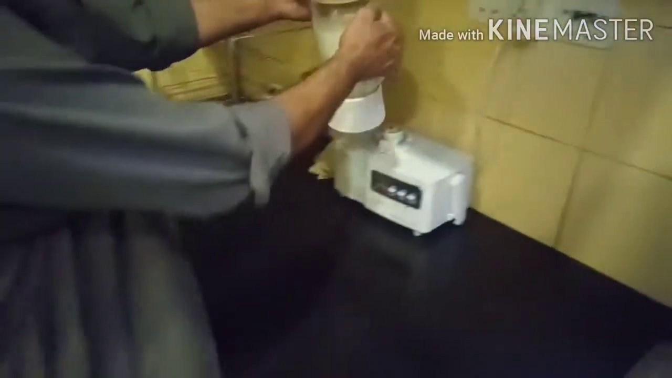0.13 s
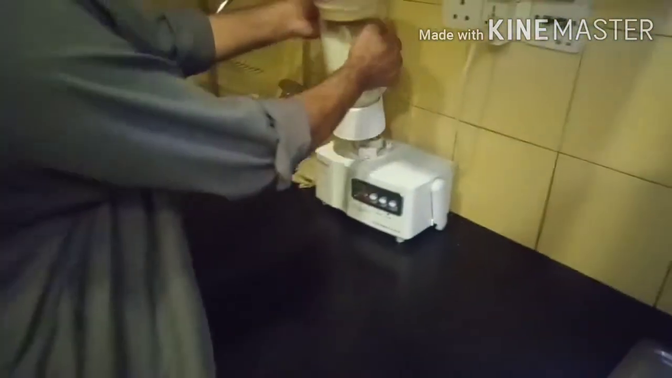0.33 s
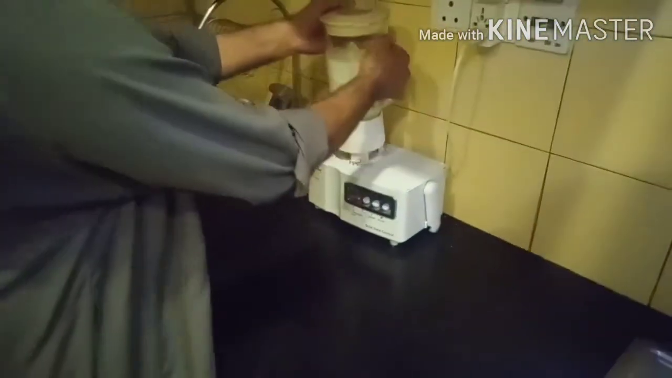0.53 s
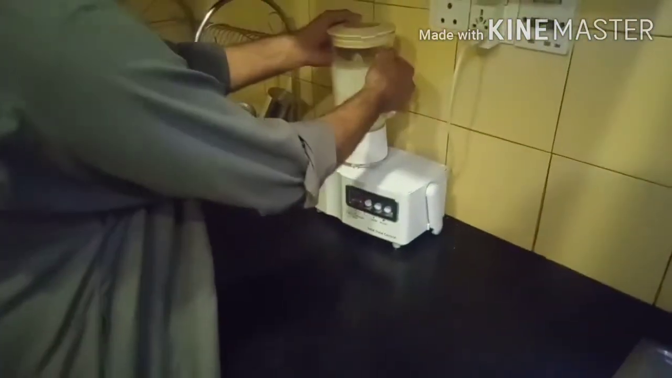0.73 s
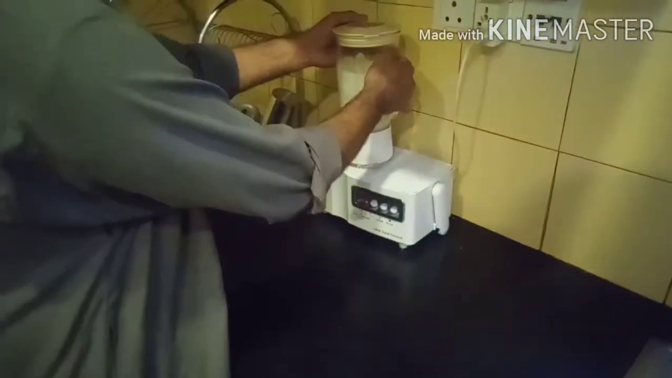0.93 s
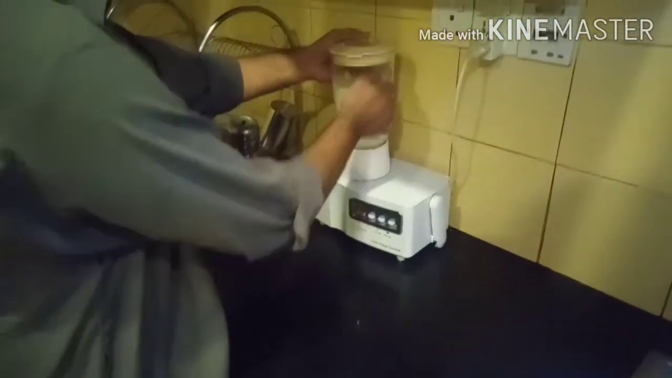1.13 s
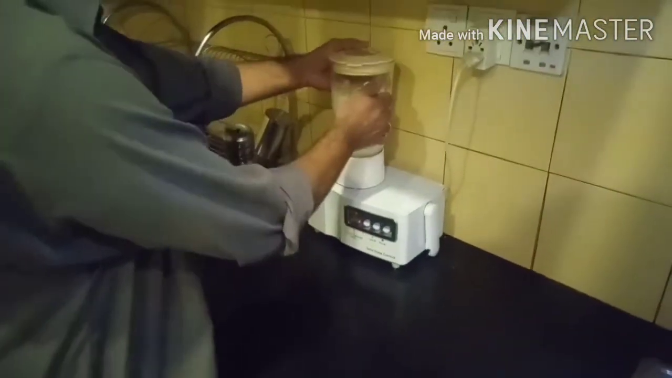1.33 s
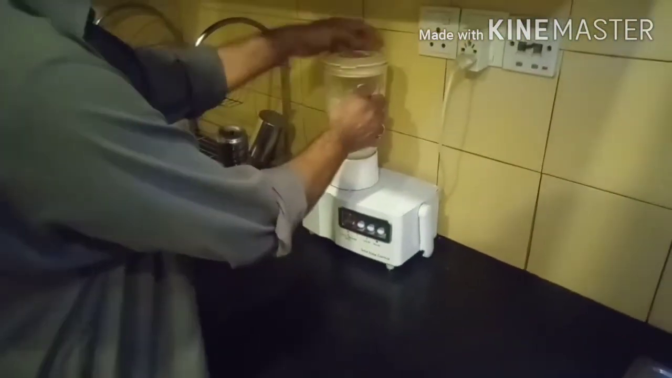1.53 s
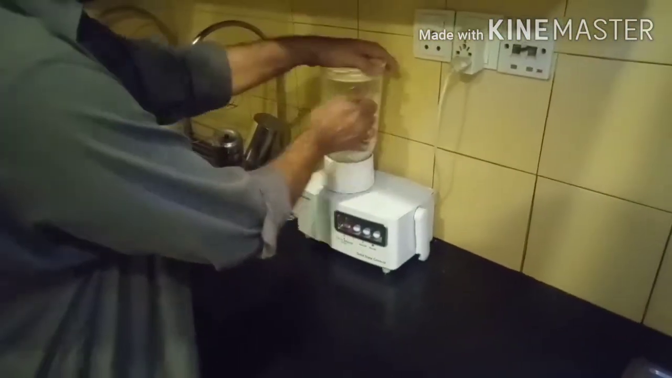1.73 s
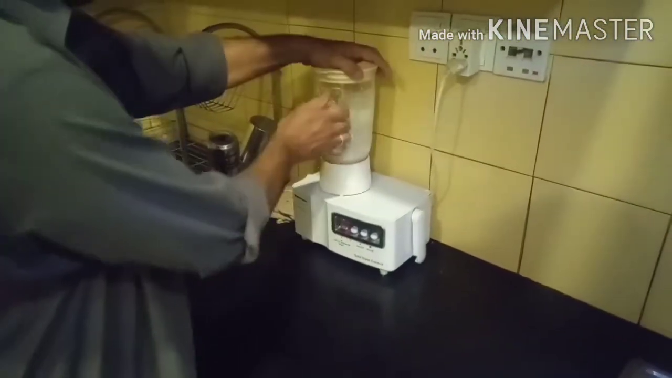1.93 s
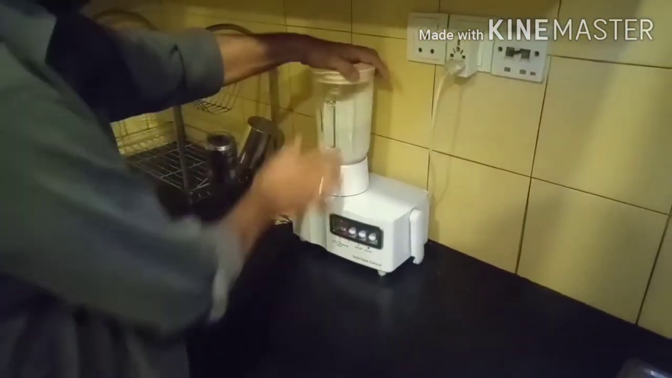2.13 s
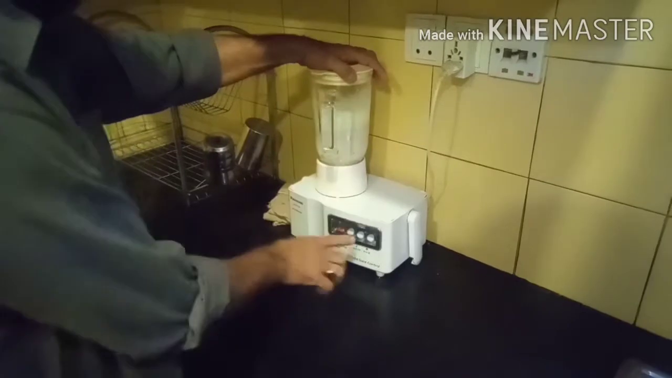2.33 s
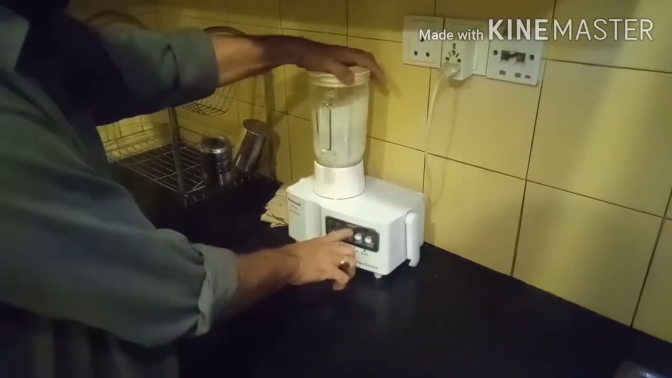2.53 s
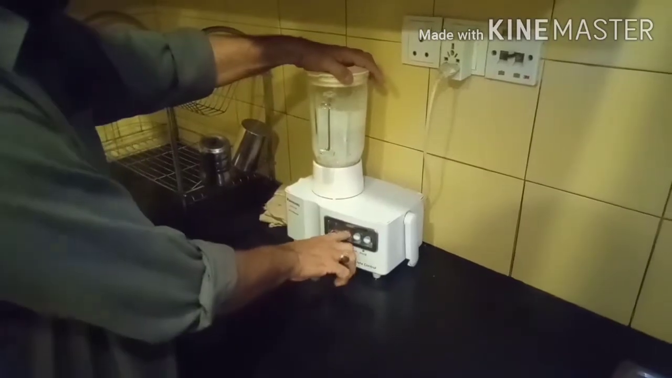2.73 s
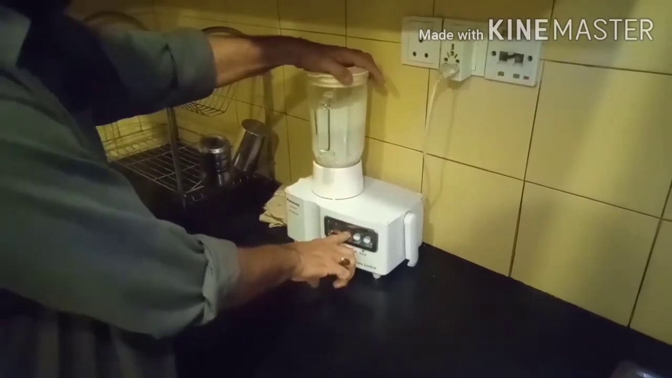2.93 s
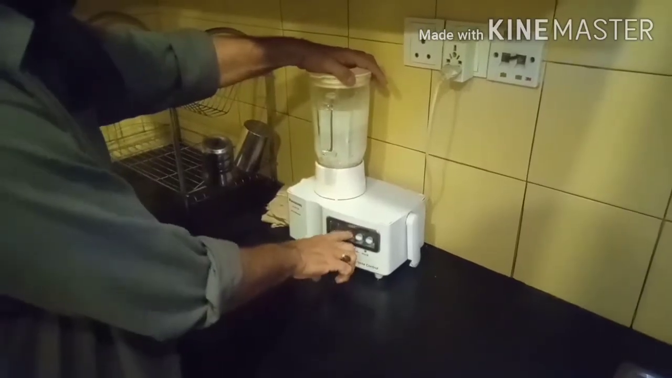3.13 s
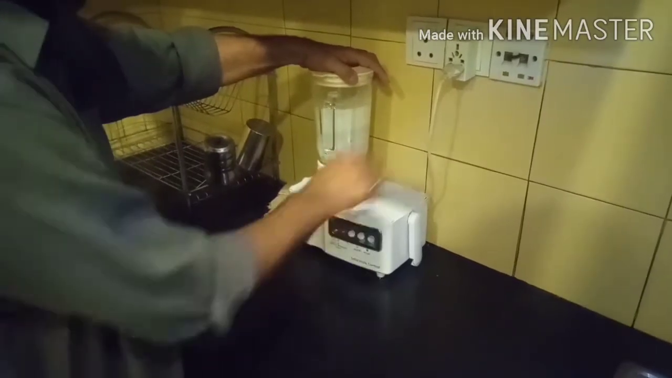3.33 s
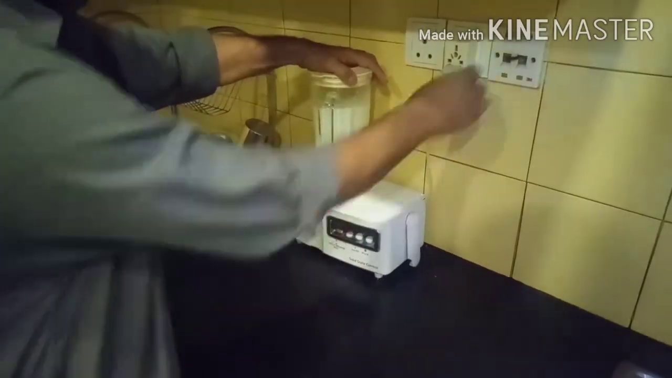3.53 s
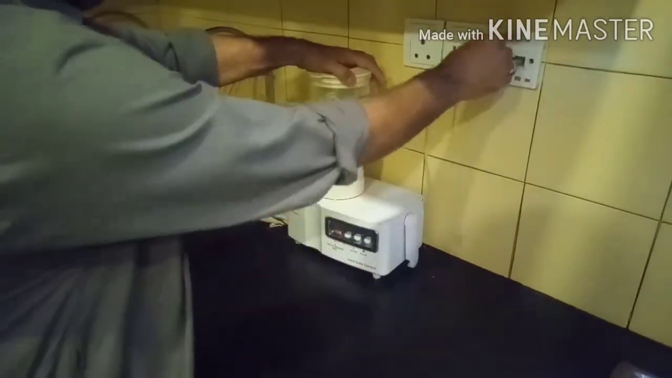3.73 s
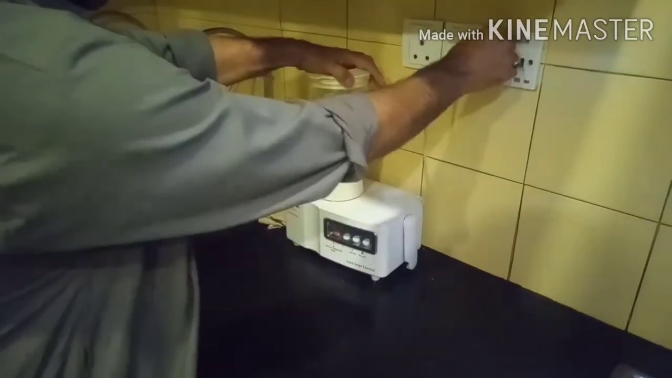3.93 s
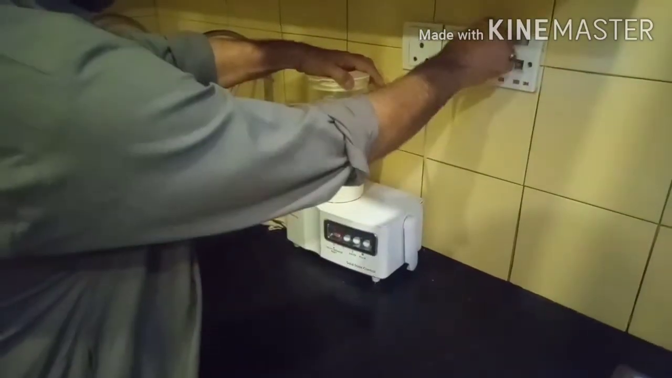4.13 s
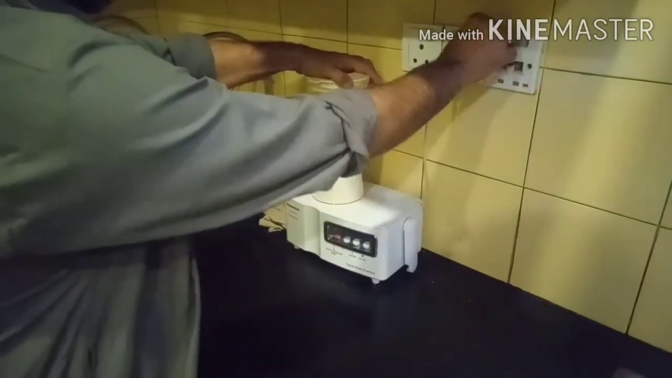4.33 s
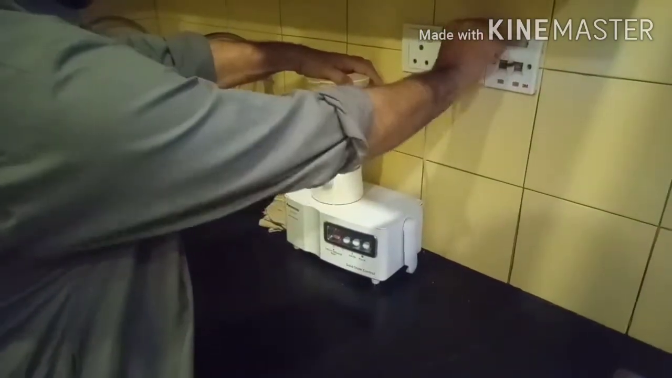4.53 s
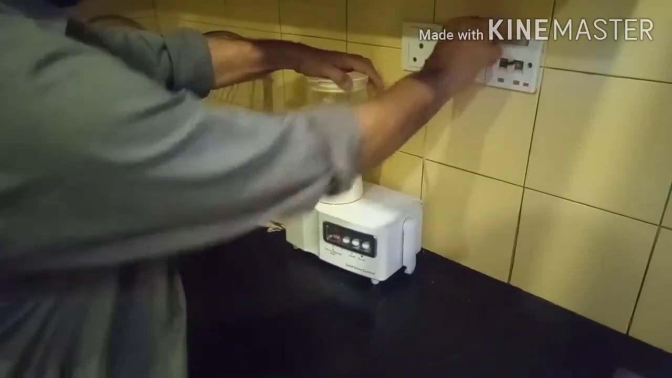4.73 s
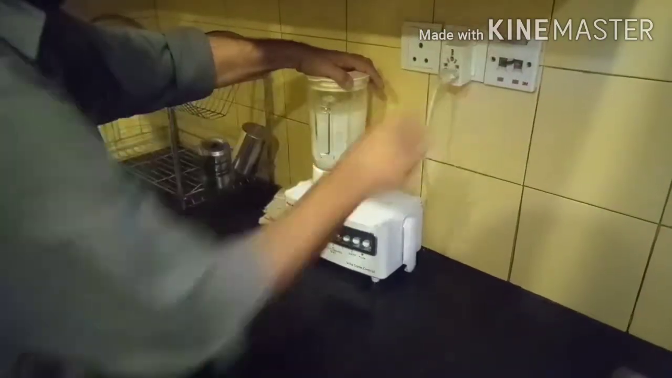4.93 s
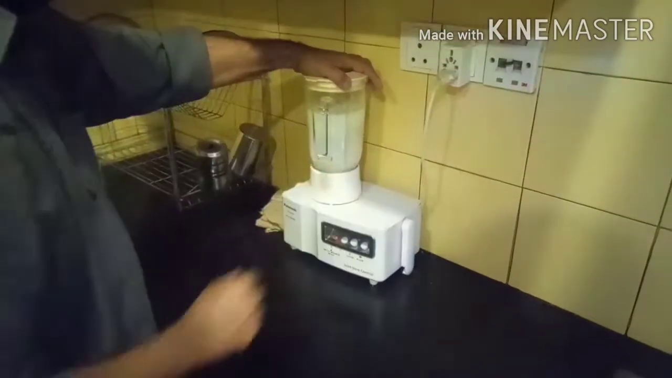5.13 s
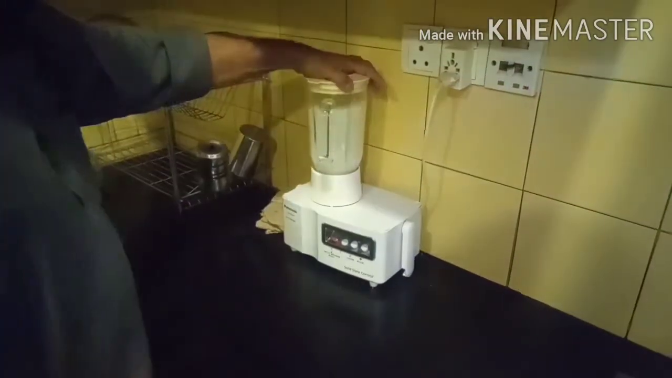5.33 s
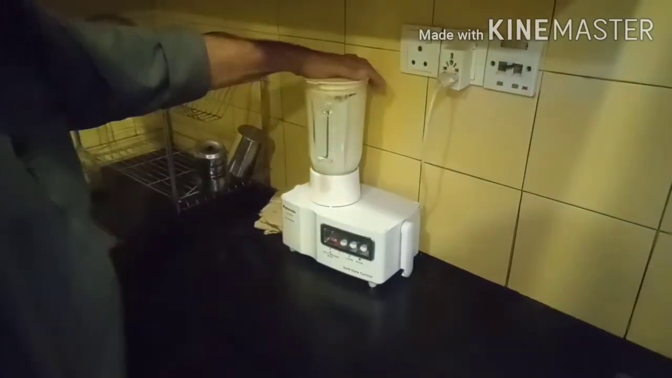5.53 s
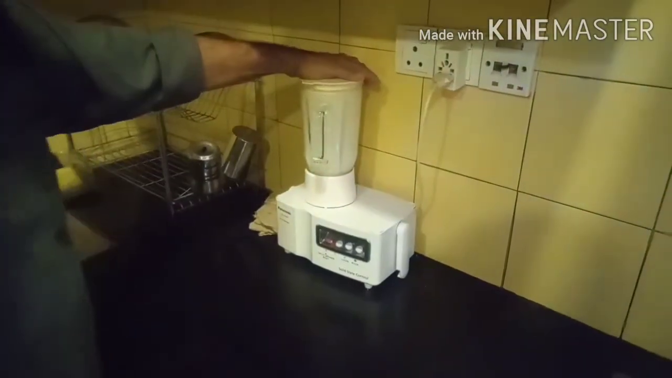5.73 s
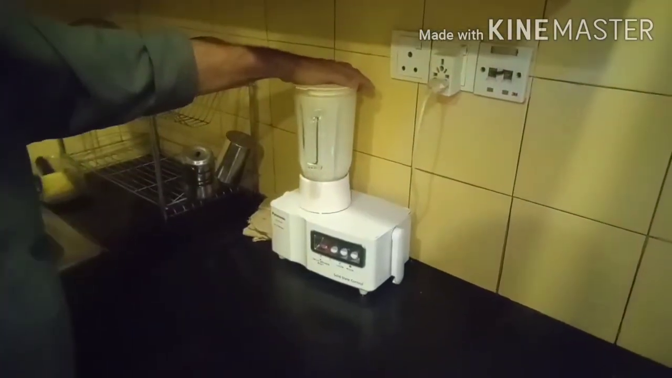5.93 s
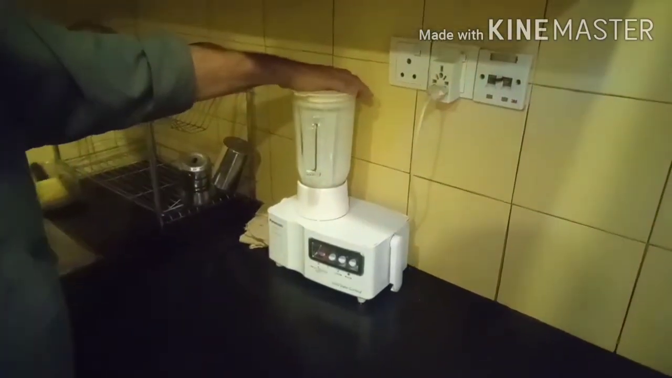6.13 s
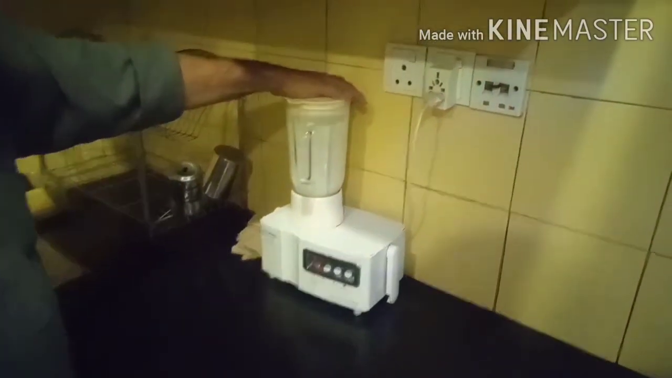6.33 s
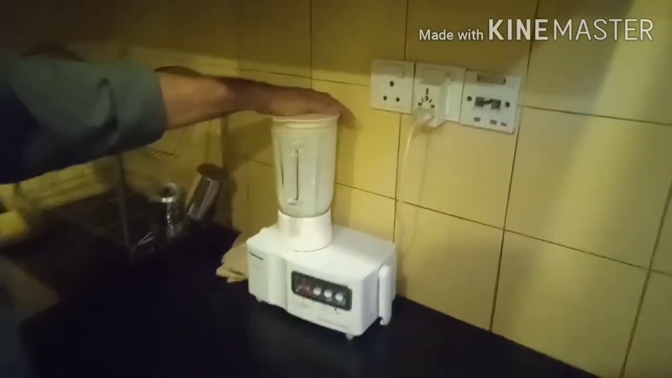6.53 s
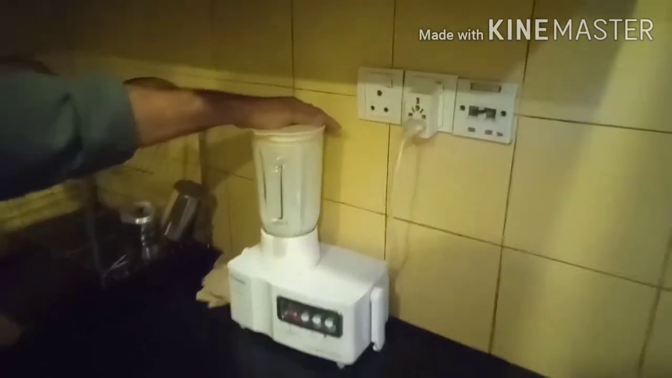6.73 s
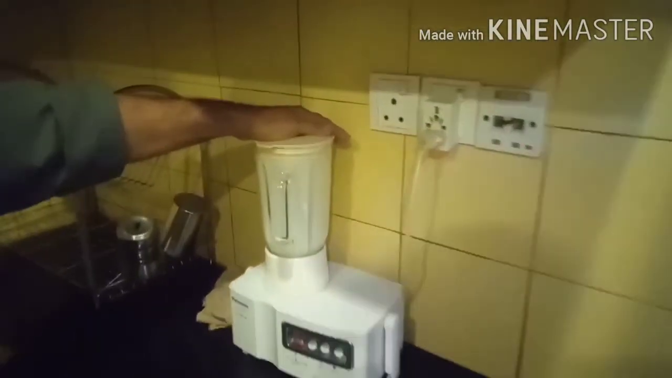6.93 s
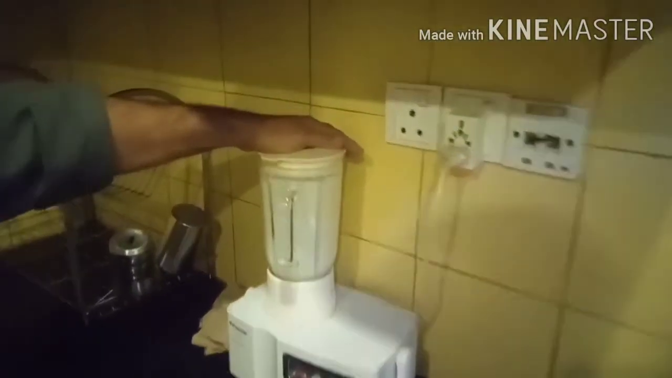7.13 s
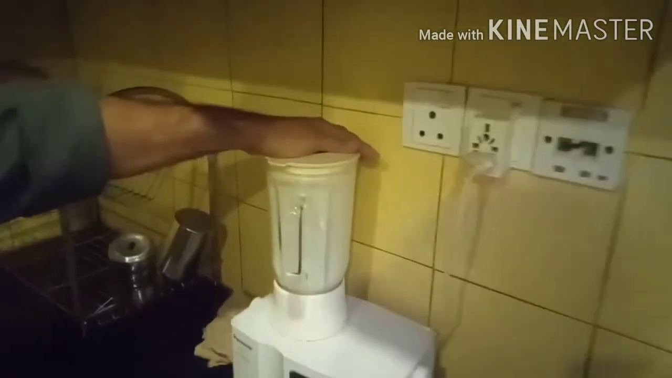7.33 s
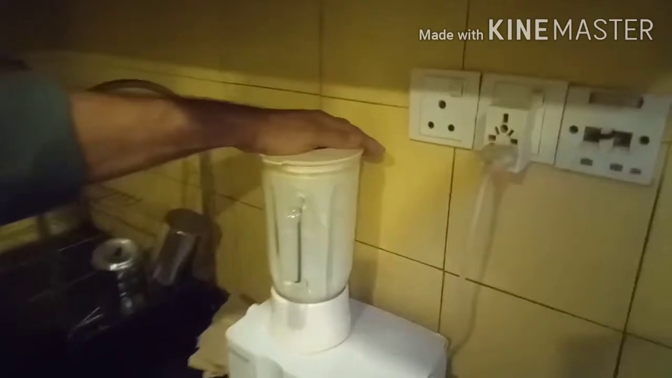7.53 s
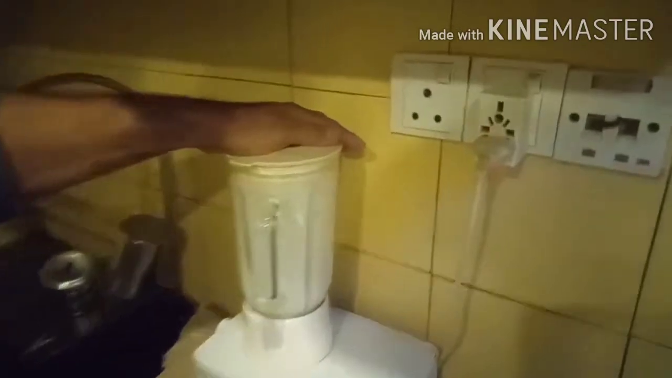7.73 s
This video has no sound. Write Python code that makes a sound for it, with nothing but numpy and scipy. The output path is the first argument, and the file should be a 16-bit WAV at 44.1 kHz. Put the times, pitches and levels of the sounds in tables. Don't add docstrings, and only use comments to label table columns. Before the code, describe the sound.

A plastic jar knocks and twists into a blender base, buttons click, a wall switch snaps and the blender motor whirrs loudly.

```python
import sys
import numpy as np
from scipy import signal
from scipy.fft import rfft, irfft, next_fast_len
from scipy.io import wavfile
from scipy.ndimage import uniform_filter1d, map_coordinates

SR = 44100
rng = np.random.default_rng(int(sys.argv[2]) if len(sys.argv) > 2 else 0)


def wrap_up_sound(samples):
    columns = np.atleast_2d(samples).T
    tamed = np.clip(columns, -1, 1)
    steps = np.round(tamed * 32767).astype(np.int16)
    wavfile.write(sys.argv[1], SR, steps)


def volts(x):
    e = np.asarray(x, float) / 20
    return 10 ** e


N = 342657
T = np.arange(N) / SR
MAINS_HZ = 50


def unit(x):
    return x / np.sqrt(np.mean(x ** 2) + 1e-20)


def along(points, hz):
    f, v = np.transpose(points)
    return np.interp(np.log(hz + 1), np.log(f + 1), v)


def curves(rows):
    s, *columns = np.transpose(rows)
    return [np.interp(T, s, column) for column in columns]


def ramp(start, length):
    return np.clip((T - start) / length, 0, 1)


def wobble(rate):
    return map_coordinates(rng.standard_normal(int(N * rate / SR) + 4), [T * rate])


def tone(hz, phase=0):
    return np.cos(2 * np.pi * hz * T + phase)


def filtered(x, response):
    m = next_fast_len(len(x) + 8192)
    return irfft(rfft(x, m) * response(np.fft.rfftfreq(m, 1 / SR)), m)[:len(x)]


def modes(table):
    def response(f):
        total = 0
        for k, (hz, width, db) in enumerate(table):
            total = total + (-1) ** k * volts(db) * 1j * f * width / (hz * hz - f * f + 1j * f * width)
        return total
    return response


def colour(spectrum):
    return lambda f: volts(along(spectrum, f)) * (f > spectrum[0][0]) * (f < spectrum[-1][0])


def ringing(spectrum, table, under_db):
    return lambda f: np.hypot(volts(under_db) * colour(spectrum)(f), np.abs(modes(table)(f)) ** 1.4)


def rush(response, patchy_db):
    z = signal.stft(rng.standard_normal(N), nperseg=1024)[2]

    def patch(tall, long):
        across = uniform_filter1d(rng.standard_normal(z.shape), tall, 0)
        return unit(uniform_filter1d(across, long, 1))

    field = patch(8, 4) + patch(2, 10)
    noise = signal.istft(z * volts(patchy_db * field), nperseg=1024)[1][:N]
    return unit(filtered(noise, response))


def bursts(times, db, t60, rise=0.0002):
    env, t = np.zeros(N + SR // 8), np.arange(SR // 8) / SR
    for s, level in np.broadcast(times, db):
        env[round(s * SR):][:len(t)] += volts(level - 60 * t / t60) * (1 - np.exp(-t / rise))
    return env[:N]


def whine(hz, width_hz):
    turn = 2 * np.pi * np.cumsum(hz) / SR
    band = wobble(width_hz) * np.cos(turn) + wobble(width_hz) * np.sin(turn)
    return unit(volts(1.1 * wobble(30)) * band)


# time in seconds, blade effort in dB, load on the housing in dB.
EFFORT = [
    (4.57, -26, -29),
    (4.66, -24.5, -27.5),
    (5.0, -27, -30),
    (5.5, -22.5, -30),
    (5.9, -21.5, -31.5),
    (6.3, -21.5, -33),
    (6.82, -22.5, -34.5),
    (6.92, -21.5, -31),
    (7.4, -19.5, -28.5),
    (7.77, -19, -28),
]
# time in seconds, lift in dB.
LUMPS = [
    (5.19, 2.5),
    (5.58, 2.5),
    (6.01, 2),
    (6.4, 0.5),
]
# time in seconds, share of the top that is rattle.
LOOSENESS = [
    (4.54, 1),
    (5.9, 0.68),
    (6.15, 0.38),
    (6.3, 0.044),
    (7.77, 0.14),
]


def motor():
    lump_s = 0.06
    lift_db = sum(db * np.exp(-((T - s) / lump_s) ** 2) for s, db in LUMPS)
    whirr_db, housing_db = curves(EFFORT) + lift_db
    loose = np.clip(curves(LOOSENESS)[0], 0, 1)
    torque = np.cos(2 * np.pi * 2 * MAINS_HZ * (T - 0.0085))
    flutter = wobble(70)
    top_db = -36 + 0.73 * (whirr_db + 22) + 6 * loose
    drone = housing(housing_db, torque, flutter)
    body = drone + churn(housing_db, flutter) + sings()
    blades = whirr(whirr_db, loose, torque, flutter) + fizz(top_db, loose)
    running = ramp(4.538, 0.013)
    return running * (body + blades + rattle(top_db, loose) + winding())


STAGE_MIDDLES = [4.9, 5.7, 6.5, 7.4]


def staged(broads, rings, under_db, patchy_db):
    total = 0
    for share, broad, table in zip(np.eye(len(rings)), broads, rings):
        fade = np.sqrt(np.interp(T, STAGE_MIDDLES, share))
        total = total + fade * rush(ringing(broad, table, under_db), patchy_db)
    return total


# frequency in Hz, level in dB per Hz.
HOUSING_SPECTRA = [
    [(24, -61), (40, -31), (65, -35), (92, -37), (123, -18), (259, -11.5), (424, -19), (776, 1.5),
     (1150, -15), (1500, -44), (2530, -120)],
    [(24, -59), (40, -25), (70, -24), (97, -16), (168, -13.5), (263, -12), (424, -15.5), (821, 2),
     (1150, -18), (1500, -42), (2530, -120)],
    [(24, -60.5), (40, -30), (92, -20), (123, -8), (259, -1), (436, -27), (524, -2.5), (765, -16),
     (1150, -9), (1500, -36), (2530, -120)],
    [(24, -65), (40, -34), (92, -14), (204, -6), (263, -31), (436, -12), (754, 4.5), (906, -4.5),
     (1150, -3), (1500, -20), (2530, -120)],
]
# frequency in Hz, width in Hz, level in dB.
HOUSING_RINGS = [
    [(262, 19, -4), (800, 320, -3.5)],
    [(273, 33, -5.5), (870, 250, -5)],
    [(275, 22, -0.5), (860, 250, -0.5)],
    [(261, 32, 1.5), (749, 70, 4)],
]


def housing(housing_db, torque, flutter):
    level_db = housing_db + 1.5 + 1.6 * torque + 1.1 * flutter + 0.36 * wobble(25)
    return volts(level_db) * staged(HOUSING_SPECTRA, HOUSING_RINGS, under_db=-2.0, patchy_db=0.8)


# frequency in Hz, level in dB per Hz.
CHURN_SPECTRUM = [(680, -28), (1150, -6.5), (1600, -10), (1710, -6), (2800, -4), (3640, -11.5),
                  (6160, -120)]
# frequency in Hz, width in Hz, level in dB.
WALL_RINGS = [
    [(1290, 79, -5), (1600, 48, -1), (2106, 25, 0), (2570, 60, 2)],
    [(1274, 67, -1), (1560, 90, 0.5), (2020, 200, -2.5)],
    [(1300, 38, 2), (1920, 130, 0.5), (2535, 18, 5)],
    [(2080, 36, -1)],
]


def churn(housing_db, flutter):
    churn_db = -29.5 + 0.79 * (housing_db + 29)
    spectra = [CHURN_SPECTRUM] * len(WALL_RINGS)
    level_db = churn_db + 0.54 + 0.29 * flutter + 0.25 * wobble(120)
    return volts(level_db) * staged(spectra, WALL_RINGS, under_db=-3, patchy_db=0.5)


# middle in seconds, half length in seconds, pitch in Hz, level in dB.
SINGING = [
    (4.62, .05, 2570, -39),
    (5.08, 0.22, 2570, -36),
    (5.6, 0.28, 4740, -37),
    (6.703, 0.33, 6160, -37.5),
    (6.8, .08, 4780, -35),
    (7.45, .08, 2870, -37),
]


def sings():
    total = 0
    for s, half, hz, db in SINGING:
        total = total + volts(db) * np.exp(-((T - s) / half) ** 4) * whine(hz + 0 * T, width_hz=70)
    return total


# frequency in Hz, level in dB per Hz.
WHIRR_SPECTRA = [
    [(1590, -15), (2700, -2.5), (3750, 2.5), (4060, -5), (4360, 0.5), (4680, -5), (5700, -8), (6600, -12),
     (8580, -30), (14500, -120)],
    [(1590, -34), (2700, -6), (3610, -0.5), (4280, -2.5), (5310, -10), (5830, -17), (6310, -14),
     (6600, -15), (8580, -41), (14500, -120)],
    [(1590, -27), (2700, -14), (3380, -3), (3840, -4), (5270, -6.5), (5730, -18), (6290, -11), (6600, -36),
     (8580, -49), (14500, -120)],
    [(1590, -39), (2700, -18), (2810, -8), (3810, -0.5), (4390, -4), (4700, -7.5), (5490, -9), (6600, -17),
     (8580, -37), (14500, -120)],
]
# frequency in Hz, width in Hz, level in dB.
WHIRR_RINGS = [
    [(2960, 60, 2), (3280, 50, 3), (3700, 170, 4.5), (4230, 200, 1), (5020, 150, -9)],
    [(3750, 120, -8), (4340, 120, 1), (4840, 70, 1.5), (5250, 150, -4), (6400, 91, -14)],
    [(3900, 110, -1), (4360, 120, 0), (5087, 90, -1), (6200, 61, -5)],
    [(3430, 110, 0.5), (3720, 50, 1), (4040, 100, -2), (4360, 98, -1), (4970, 47, -4), (5200, 130, -4)],
]
# time in seconds, pitch in Hz, dB relative to the whirr.
BLADE_DRIFT = [(5.35, 3725, -12), (5.5, 3750, -21), (5.62, 3740, -6), (5.72, 3800, -10), (5.82, 4040, -6),
               (5.95, 3700, -21), (6.12, 3920, -9), (6.5, 3856, -6.5), (6.82, 3800, -3.5), (7.0, 3720, -10),
               (7.2, 3580, -12), (7.37, 3560, -4), (7.46, 3620, -19), (7.56, 3970, -4), (7.64, 3900, -9),
               (7.77, 3700, -17)]
# time in seconds, steady hub and late ridge in dB relative to the whirr.
HUB_AND_RIDGE = [(5.35, -14, -40), (5.58, -5.5, -40), (5.66, -20, -40), (5.74, -3, -37), (5.9, -17, -35),
                 (6.05, -1.5, -30), (6.2, -12, -25), (6.6, -5, -27), (6.95, -7, -28), (7.24, -8, -19),
                 (7.36, -9, -6), (7.43, -25, -17), (7.5, -9, -4), (7.62, -10, -11), (7.77, -8, -5)]


def whirr(whirr_db, loose, torque, flutter):
    tearing = staged(WHIRR_SPECTRA, WHIRR_RINGS, under_db=1.0, patchy_db=1.1)
    blade_hz, blade_db = curves(BLADE_DRIFT)
    hub_db, ridge_db = curves(HUB_AND_RIDGE)
    hub_hz = 4364 + 25 * wobble(3.2)
    ridge_hz = 5460 - 300 * np.abs(T - 7.35)
    whines = volts(blade_db) * whine(blade_hz, width_hz=220)
    whines += volts(hub_db) * whine(hub_hz, width_hz=200)
    whines += volts(ridge_db) * whine(ridge_hz, width_hz=400)
    thinned = ramp(BLADE_DRIFT[0][0], 0.12)
    level_db = whirr_db - 0.75 + 0.73 * loose * torque + 0.62 * flutter + 0.75 * wobble(400)
    return volts(level_db) * (tearing + thinned * whines)


# frequency in Hz, level in dB per Hz.
FIZZ_SPECTRUM = [(3760, -14), (6400, -1), (6640, -3), (7620, -4), (9210, -14), (10600, -19.5),
                 (12800, -18.5), (15600, -35)]


def fizz(top_db, loose):
    return volts(top_db + 2.1 * wobble(300)) * np.sqrt(1 - loose) * rush(colour(FIZZ_SPECTRUM), patchy_db=-0.5)


# frequency in Hz, level in dB per Hz.
COUPLING_SPECTRUM = [(3530, -41), (6000, -17), (6390, 2), (7090, 2.5), (8520, -12.5), (9500, -11.5),
                     (10400, -11.5), (11000, -9), (11800, -13.5), (14500, -21), (15600, -29)]
# time in seconds, peak in dB.
HARD_RATTLES = [(4.5538, -17), (4.5753, -13), (4.5957, -15), (4.6152, -15), (4.7364, -18), (4.7963, -15),
                (4.8467, -17), (4.8661, -14), (4.907, -15), (4.9375, -16), (4.9759, -17), (4.9973, -14),
                (5.0178, -16), (5.0362, -14), (5.0562, -17), (5.0772, -15), (5.1086, -16), (5.126, -17),
                (5.1674, -18), (5.2263, -17), (5.2797, -17), (5.3171, -16), (5.3366, -14), (5.4074, -17),
                (5.4593, -20), (5.5052, -15), (5.5271, -14), (5.5955, -15), (5.6164, -10), (5.6878, -13),
                (5.7047, -14), (5.8983, -16), (5.9352, -17), (5.9681, -13), (6.039, -18), (6.0564, -15),
                (6.0779, -16), (6.1168, -17), (6.3567, -16), (6.948, -21), (7.6897, -20)]


def rattle(top_db, loose):
    beat = np.arange(4.5565, N / SR - 0.01, 0.5 / MAINS_HZ)
    luck = rng.standard_normal((len(beat), 2))
    late = 0.0013 * luck[:, 0]
    beat_db = 3 * luck[:, 1] + 3.9 * (-1) ** np.arange(len(beat))
    taps = unit(0.5 + bursts(beat + late, beat_db, t60=0.024))
    s, db = np.transpose(HARD_RATTLES)
    blows = volts(top_db - 0.5) * np.sqrt(loose) * taps + bursts(s, db - 15, t60=0.022)
    teeth = rush(colour(COUPLING_SPECTRUM), patchy_db=0.5)
    shaken_jar = volts(0.5) * rush(colour(WHIRR_SPECTRA[0]), patchy_db=-2.0)
    return blows * (teeth + shaken_jar)


def winding():
    second = volts(-53 + 0.5 * wobble(5.8)) * tone(2 * MAINS_HZ, phase=3)
    third = volts(-50.0 + 1.4 * wobble(1.52)) * tone(3 * MAINS_HZ)
    return second + third


# frequency in Hz, width in Hz, level in dB.
BASE_MODES = [
    (264, 27, 8.2),
    (207, 75, 0.91),
]
JAR_MODES = [
    (665, 150, 7),
    (910, 240, 5.5),
    (1010, 260, -25),
    (1300, 120, -12),
]


def contacts(table, body, top, snap_hz, spread, rise, t60, gain_db):
    s, db, base_db, jar_db, edge_db = np.transpose(table)
    db = db + gain_db
    snap, t = np.zeros(N + SR), np.arange(SR // 8) / SR
    harder = 1 + 0.0032 * (db - db.mean())
    pitches = snap_hz * harder * np.exp(spread * rng.standard_normal(len(s)))
    noises = rng.standard_normal((len(s), len(t)))
    for start, level, hz, noise in zip(s, db, pitches, noises):
        rasp = unit(filtered(noise, ringing(body, [(hz, 0.076 * hz, 1.5)], under_db=0.5)))
        snap[round(start * SR):][:len(t)] += volts(level - 60 * t / t60) * (1 - np.exp(-t / rise)) * rasp
    edge_noise = unit(filtered(rng.standard_normal(N), colour(top)))
    edge = bursts(s, db + edge_db + 3.5, 0.69 * t60, rise) * edge_noise
    jar = filtered(bursts(s, db + jar_db + 16, 0.0029), modes(JAR_MODES))
    base = filtered(bursts(s, db + base_db + 21.5, 0.0093, rise=0.00086), modes(BASE_MODES))
    return snap[:N] + edge + jar + base


# time in seconds, peak in dB, then base thud, jar knock and top edge in dB relative to the peak.
LANDING = [(0.6414, -42, -11, -5, -10), (0.6705, -38.5, -9, -7, -5), (0.6897, -31, -19, -16, -18),
           (0.7535, -32, -15, -4, -25), (0.7595, -29.5, -6, -4, -20), (0.7641, -33, -18, 2, -4),
           (0.7922, -27, -7.5, -3, -17), (0.8252, -32, -22, -8, -13), (0.9003, -37, 5.5, 7, -24),
           (0.9265, -47, -9, -9, -5), (1.0694, -39, 8, 4, -19), (1.112, -35, -14, -9, -3),
           (1.1273, -33, -13, -13, -15), (1.1545, -30, -21, -7, -15), (1.1625, -19, -28, -7, -24),
           (1.1795, -21.5, -4, -3, -12), (1.186, -23, -3, -1, -11), (1.196, -28, -14, 2, -12),
           (1.2068, -27, -18, 0, -29), (1.23, -31, -21, 4, -6), (1.2574, -34, -20, 4, -20)]
TWISTING = [(1.725, -46, -17, -15, -4), (1.7503, -29, -5, -15, -12), (1.7915, -23, -10, -17, -18),
            (1.7977, -23, -8, -10, -5), (1.8095, -21, -5.5, -8, -15), (1.8305, -28.5, -18, -9, -2),
            (1.845, -31, -18, -6, -12), (1.8645, -41, -13, -5, -8), (1.883, -42, -25, -20, -17),
            (1.888, -13, -17, 5.5, -9), (1.892, -15.5, -20, -3, -2), (1.8962, -16, -20, 11, -7),
            (1.901, -24, -22, -6, -3), (1.9135, -23.5, -21, 4, -2), (1.933, -32, -20, -8, -6),
            (1.9505, -20, -23, -10, -14), (1.9625, -19, -17, -8, -6), (1.9825, -24, -32, -2, -3)]
# frequency in Hz, level in dB per Hz.
JAR_SNAP = [(410, -34), (700, -5), (2270, -0.5), (2580, 0), (2820, -6), (3410, 0), (6000, -11.5),
            (7800, -43), (13200, -120)]
JAR_RIM = [(3240, -37), (5500, -10), (6950, 3.5), (8230, -10), (11200, -11), (15500, -23)]


def jar_contacts():
    landing = contacts(LANDING, JAR_SNAP, JAR_RIM, snap_hz=3240, spread=0.11, rise=0.00066, t60=0.044,
                       gain_db=-3.0)
    lock = contacts(TWISTING, JAR_SNAP, JAR_RIM, snap_hz=3200, spread=0.15, rise=0.00066, t60=0.034,
                    gain_db=-3.0)
    return landing + lock


# time in seconds, level in dB, pitch in Hz, t60 in seconds.
HANDLING_BUMP = [
    (1.188, -33, 53.7, 0.3),
]


def handling_bump():
    total = 0
    for s, db, hz, t60 in HANDLING_BUMP:
        t = np.abs(T - s)
        boom = volts(db - 60 * t / t60) * np.sin(2 * np.pi * hz * t) * (1 - np.exp(-t / 0.023))
        total = total + boom * (T > s)
    return total


# time in seconds, peak in dB, then base thud, jar knock and top edge in dB relative to the peak.
BUTTONS = [
    (2.6935, -26.5, -27, -20, -13),
    (2.776, -15, -26, -11, -17.5),
    (2.9431, -27, -29, -22, -20),
    (3.1765, -38, -24, -20, -11),
    (3.1825, -29.5, -22, -22, -22),
    (3.1916, -33, -16, -16, -6.5),
    (3.2727, -41, -11, -4, -9),
    (4.133, -43, -9, -11, -22),
    (4.2716, -32.5, -20, -11, -13),
]
# frequency in Hz, level in dB per Hz.
BUTTON_BODY = [(410, -34), (700, -3), (1250, -4), (1600, -3), (2010, -2.5), (2300, -3), (2620, 0.5),
               (2900, -3), (3500, 4.5), (4300, -5), (5200, -19), (7800, -43), (13200, -120)]
BUTTON_EDGE = [(3240, -33), (5400, -14), (6200, 1.5), (6900, -6), (9050, -19), (11000, -17), (15500, -30)]


def buttons():
    return contacts(BUTTONS, BUTTON_BODY, BUTTON_EDGE, snap_hz=3560, spread=0.03, rise=0.0003, t60=0.046,
                    gain_db=-3.5)


# time in seconds, peak in dB, then base thud, jar knock and top edge in dB relative to the peak.
WALL_SWITCH = [
    (4.519, -11, -34, -31, -6),
]
# frequency in Hz, level in dB per Hz.
SWITCH_BODY = [(710, -36), (1200, -18), (2410, -4), (2650, -4), (2890, 2), (3100, -9), (3360, 5),
               (3900, -2), (4280, -2), (4690, -5), (5600, -16), (7800, -41), (13200, -120)]
SWITCH_EDGE = [(3240, -33), (5500, -15), (6400, -1), (9050, -21), (11000, -16), (15500, -26)]


def wall_switch():
    return contacts(WALL_SWITCH, SWITCH_BODY, SWITCH_EDGE, snap_hz=4700, spread=0, rise=0.00036, t60=0.053,
                    gain_db=-6.0)


def stroke(s, db, swell, fade):
    return volts(db - 60 * np.where(T < s, (s - T) / swell, (T - s) / fade))


# loudest moment in seconds, level in dB, swell in seconds, fade in seconds.
SEAT_STROKES = [
    (0.768, -40, 0.033, 0.13),
    (1.182, -29.5, 0.055, 0.14),
    (1.231, -41, 0.027, 0.11),
    (1.796, -34, 0.016, 0.27),
    (1.899, -30, 0.017, 0.17),
    (1.966, -37.5, 0.17, 0.17),
]
LUG_SCRAPES = [
    (1.8, -31, .04, .2),
    (1.864, -38, .1, .06),
    (1.963, -26, .2, .16),
    (1.9, -29, .02, .17),
    (0.768, -39, .08, .07),
    (1.19, -37, .08, .15),
]
# frequency in Hz, level in dB per Hz.
SEAT_SPECTRUM = [(88, -45), (150, -37), (263, 4.5), (420, -12), (766, 5.5), (1130, -3.5), (2410, -10.5),
                 (2600, -6.5), (5870, -21), (6730, -19), (15500, -53)]
LUG_SPECTRUM = [(1200, -22), (2000, -5), (3000, 0), (4300, 1.5), (5400, -14), (6900, -2), (8300, -16),
                (11200, -19), (15500, -31)]


def slides():
    grind = volts(3.2 * wobble(250) + 6.5) * rush(colour(SEAT_SPECTRUM), patchy_db=0.0)
    scrape = volts(2 * wobble(300)) * rush(colour(LUG_SPECTRUM), patchy_db=3.5)
    rubbing = sum(stroke(*row) for row in SEAT_STROKES) * grind
    scraping = sum(stroke(*row) for row in LUG_SCRAPES) * scrape
    return rubbing + scraping


# frequency in Hz, level in dB per Hz.
CLOTH_SPECTRUM = [(2350, -31), (4000, -2), (9630, -13), (12600, -17), (15500, -26)]


def sleeve():
    middle_s, width_s, level_db = 0.36, 0.086, -52.5
    swell = np.exp(-((T - middle_s) / width_s) ** 2)
    return volts(level_db) * swell * rush(colour(CLOTH_SPECTRUM), patchy_db=0)


# frequency in Hz, t60 in seconds.
WALL_DECAY = [
    (200, 0.33),
    (1500, 0.48),
    (6000, 0.16),
    (14000, 0.19),
]


def room(x):
    hz, t, z = signal.stft(rng.standard_normal(SR // 2), SR, nperseg=256)
    decay = volts(-60 * t / along(WALL_DECAY, hz)[:, None])
    tail = signal.istft(z * decay, SR, nperseg=256)[1]
    delayed = np.pad(x, (200, 0))
    return signal.fftconvolve(delayed, tail / np.linalg.norm(tail))[:N]


# frequency in Hz, level in dB per Hz.
FAN_SPECTRUM = [(18, -54), (30, -22), (64, -12.5), (98, -11.5), (193, -12.5), (285, -4.5), (350, -8),
                (496, -7.5), (717, -8.5), (4000, -18), (5200, -46), (8800, -120)]
HISS_SPECTRUM = [(2350, -18), (4000, -8.5), (4720, -8), (5560, -9.5), (6060, -6.5), (7300, -10.5),
                 (9010, -24), (11700, -25), (15600, -36)]
# frequency in Hz, width in Hz, level in dB.
FAN_MODES = [
    (103.6, 22.6, 0.5),
    (264, 73, -2),
    (1228, 46, -1.5),
    (3350, 150, -10.5),
    (5840, 150, -17),
    (6340, 56, -24),
    (11600, 77, -36),
]


def air():
    level_db = -43 + 0.5 * wobble(3.57)
    socket = volts(-53.5) * ramp(4.2, 0.1)
    hum = (volts(-63.5 + 3.4 * wobble(3.1)) + socket) * tone(2 * MAINS_HZ, phase=3)
    fans = rush(ringing(FAN_SPECTRUM, FAN_MODES, under_db=4.0), patchy_db=1.04)
    hiss = volts(-16) * rush(colour(HISS_SPECTRUM), patchy_db=1)
    return hum + volts(level_db + 0.5) * (fans + hiss)


def scene():
    hands = jar_contacts() + handling_bump() + buttons() + wall_switch() + slides() + sleeve()
    return (motor() + hands + volts(-12.0) * room(hands) + air())[None]


def band_limit(x):
    return signal.sosfilt(signal.butter(12, 15700, fs=SR, output="sos"), x)


def record(dry):
    low_cut_hz, top_hz = 17, 15690
    thin = filtered(dry[0], lambda f: (1j * f / (low_cut_hz + 1j * f)) ** 2 * (f < top_hz))
    return band_limit(thin[None])


dry = scene()
out = record(dry)
wrap_up_sound(out)
```